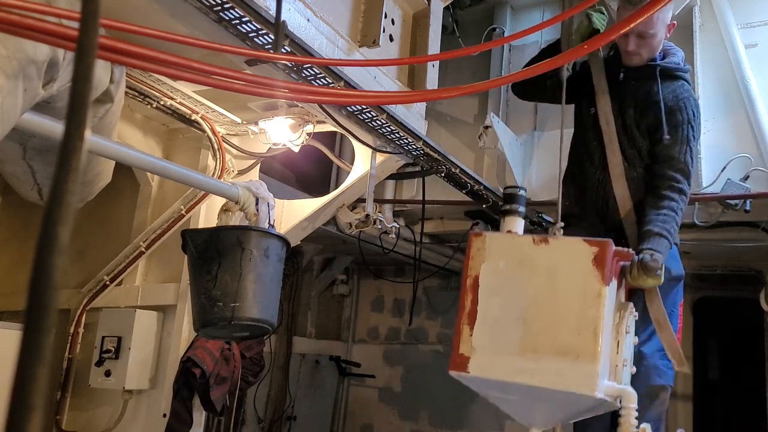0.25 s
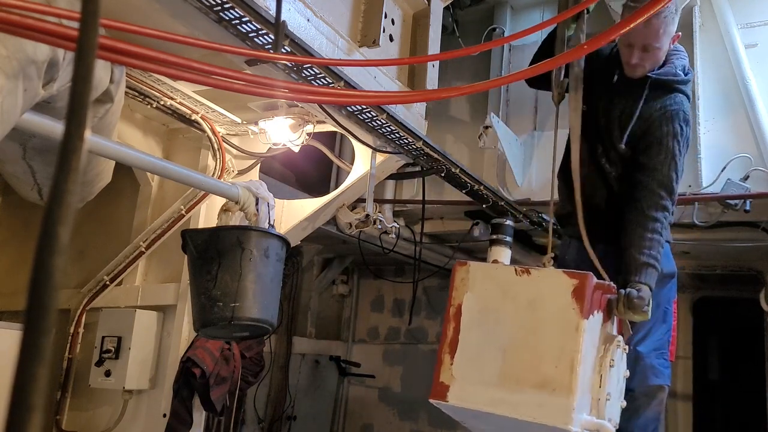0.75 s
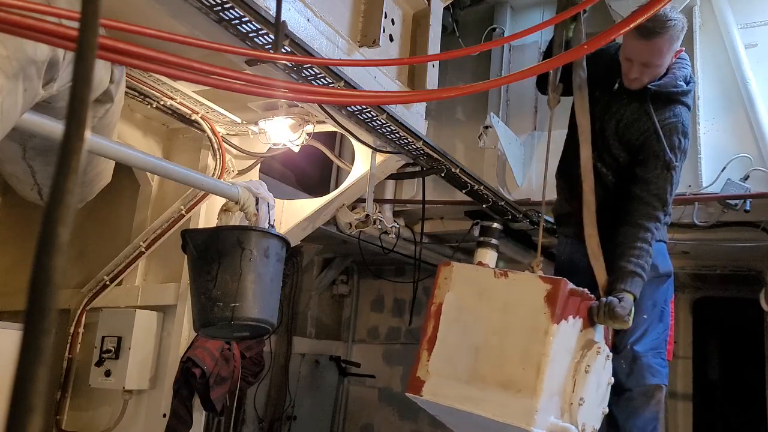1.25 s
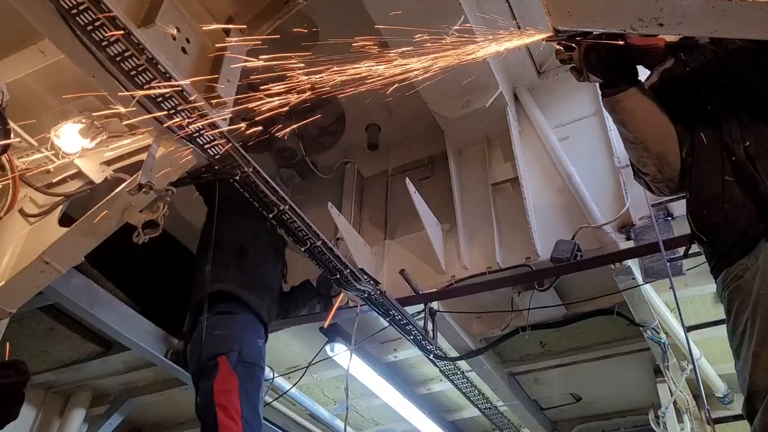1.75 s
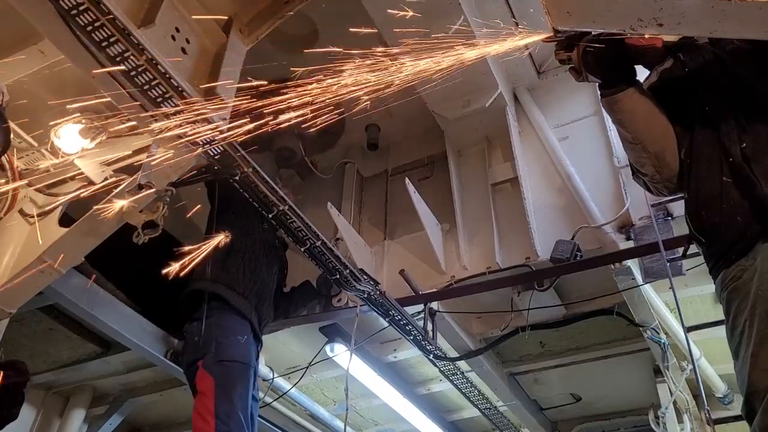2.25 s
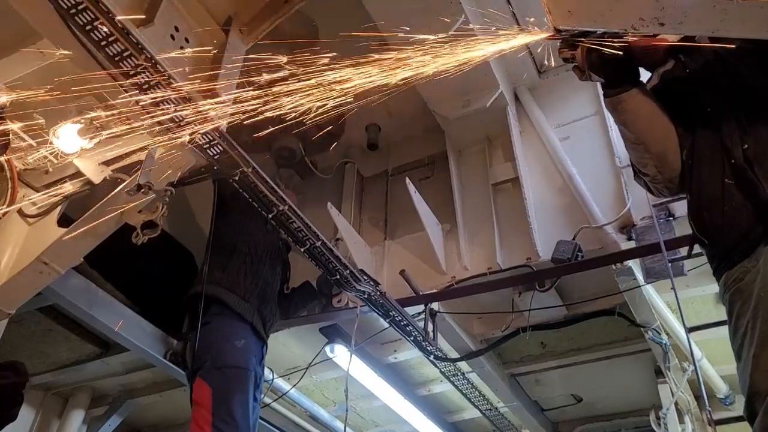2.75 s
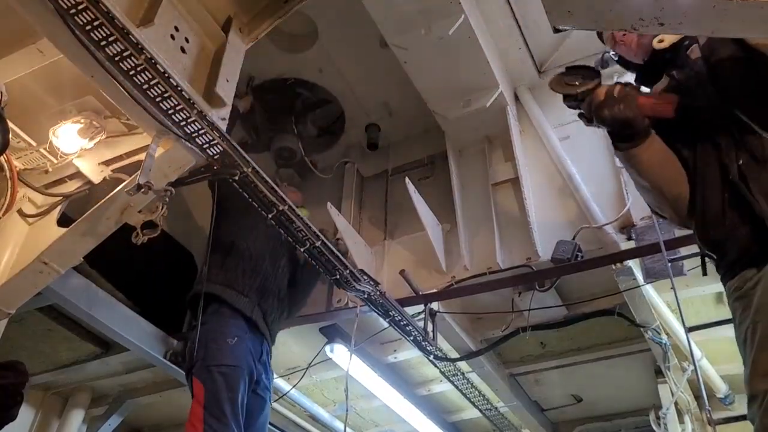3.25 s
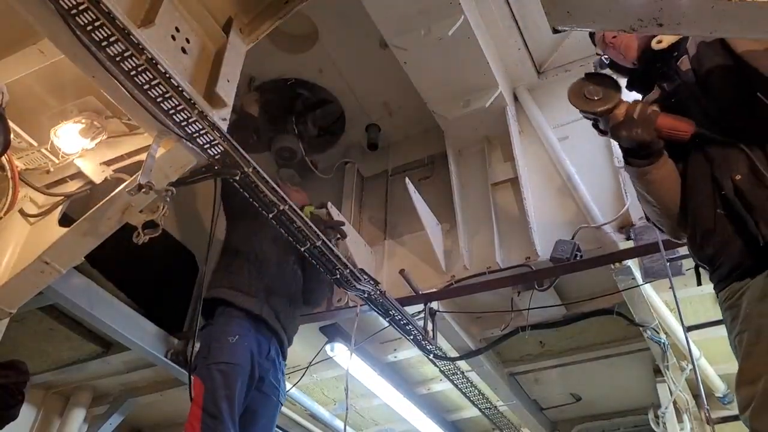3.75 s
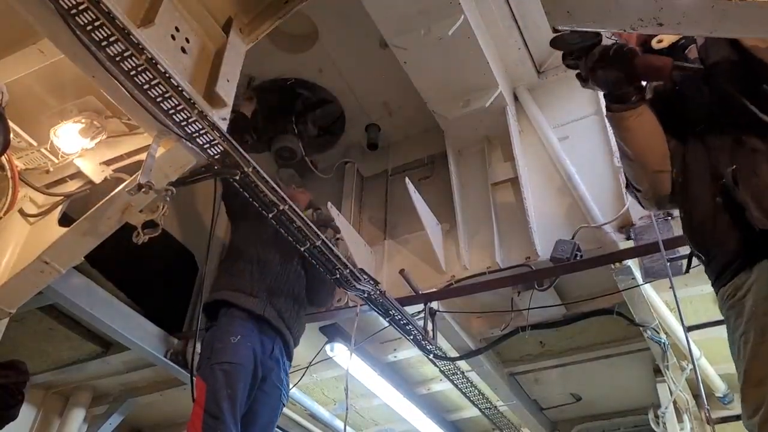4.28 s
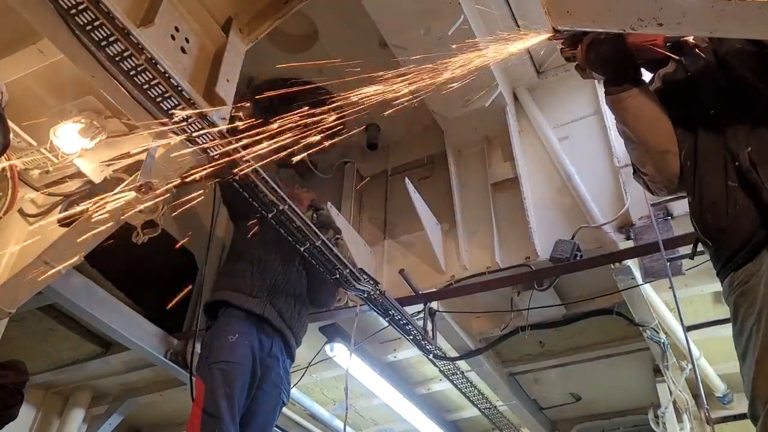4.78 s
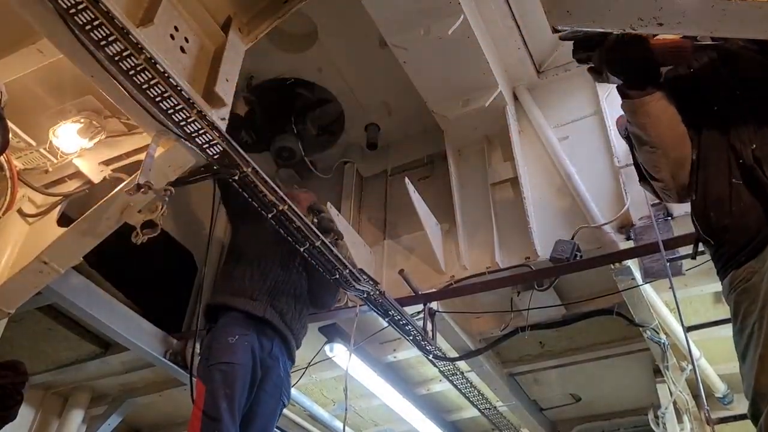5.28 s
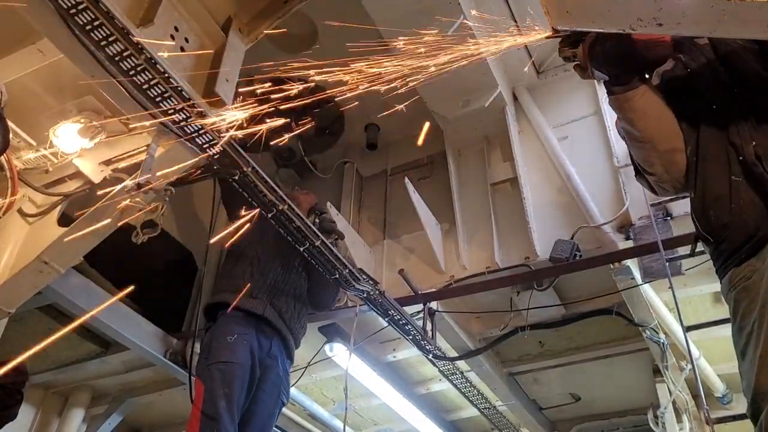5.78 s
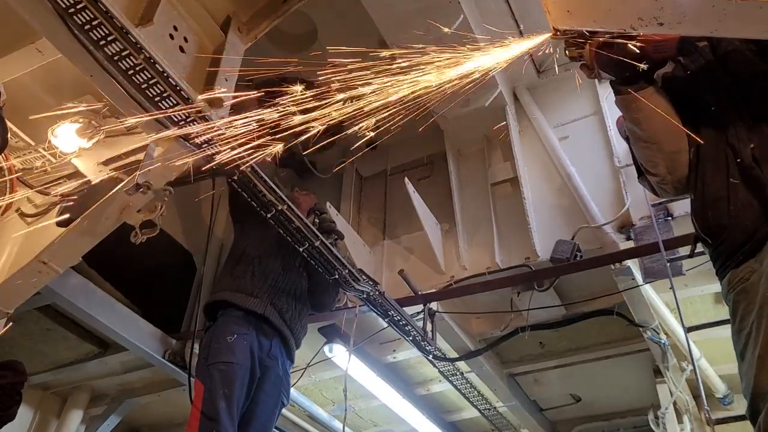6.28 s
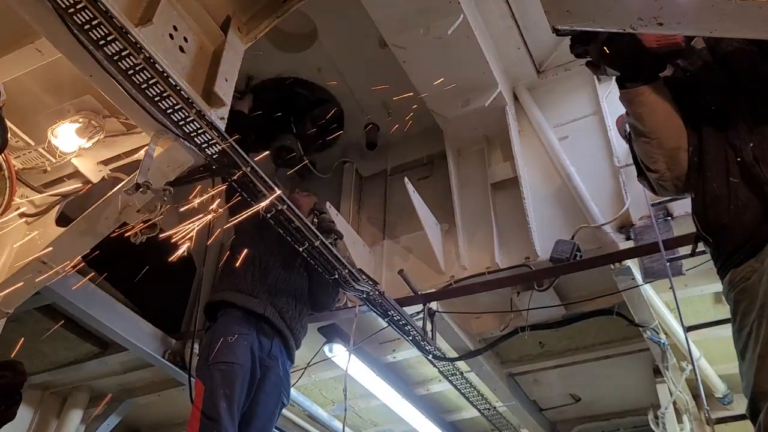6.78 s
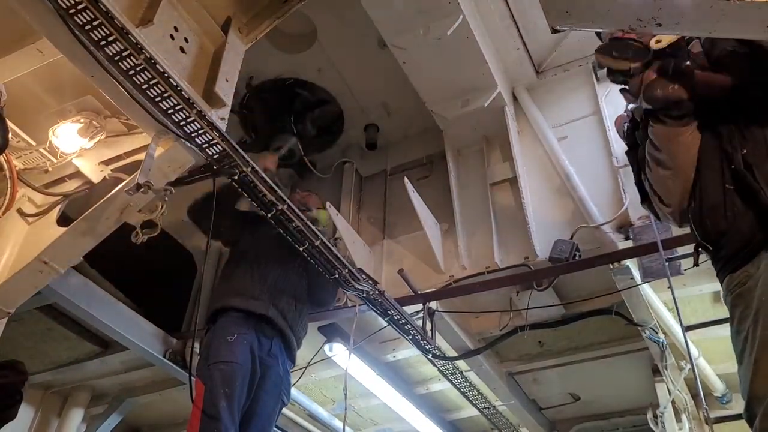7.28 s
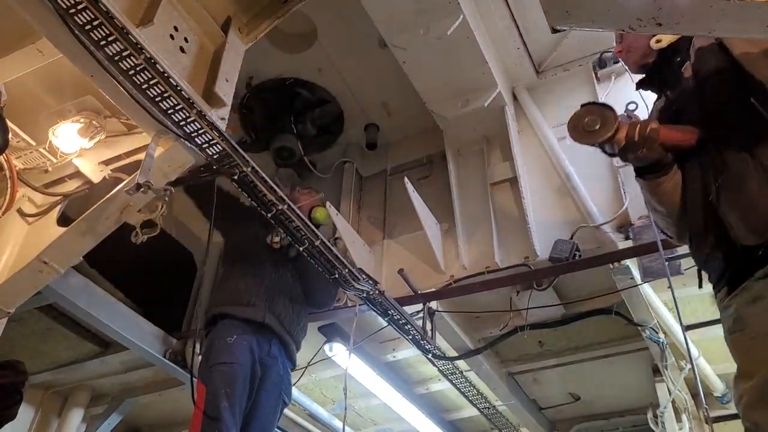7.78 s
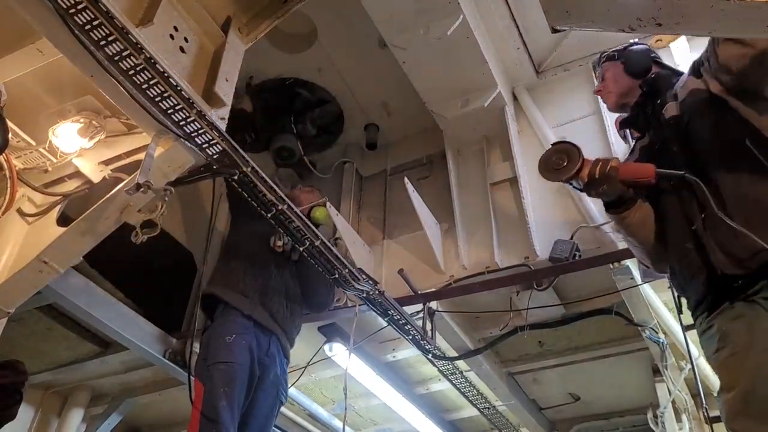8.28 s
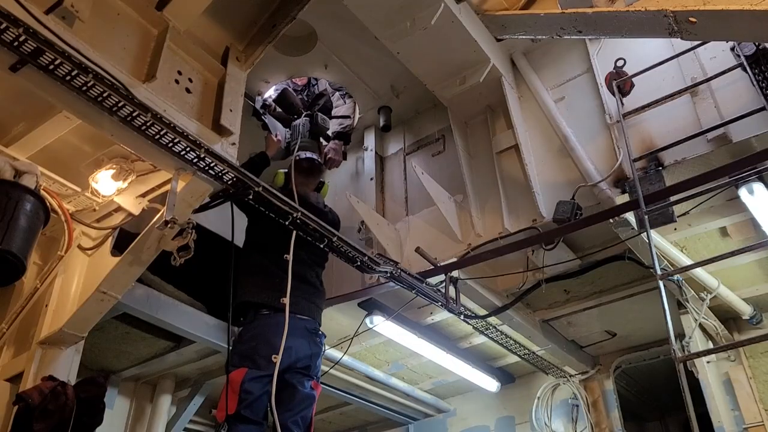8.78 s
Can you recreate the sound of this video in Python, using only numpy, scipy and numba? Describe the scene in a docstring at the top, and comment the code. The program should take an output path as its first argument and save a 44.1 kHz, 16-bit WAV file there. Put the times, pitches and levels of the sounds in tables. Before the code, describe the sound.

Inside a ship's steel hull, a hanging tank bumps the steelwork several times with low, hollow booms and a light scuff. Abruptly a generator drones and an angle grinder rasps into steel three times, its whine sagging with each bite and rising as it spins free. Near the end the grinder cuts off, the drone changes tone as if heard from another spot, and something squeaks faintly.

```python
"""Work inside a steel hull.

A slung tank bumps the steelwork of a quiet bay, and its faces and panels boom in their own modes.
Abruptly a four-cylinder generator drones through the plating in harmonics of its cycle, while an
angle grinder whines and bites steel three times, slowing under load. Near the end the grinder cuts
off, the engine is heard from a second place, where other harmonics are loud, and something squeaks."""
import sys
import numpy as np
from scipy import signal
from scipy.fft import rfft, irfft, next_fast_len
from scipy.io import wavfile
from scipy.ndimage import uniform_filter1d
from numba import njit

SR = 44100
rng = np.random.default_rng(int(sys.argv[2]) if len(sys.argv) > 2 else 0)


def master(y):
    """Save y as 16-bit WAV."""
    cut = np.clip(np.atleast_2d(y).T, -1, 1)
    pcm = np.round(cut * 32767)  # scale
    wavfile.write(sys.argv[1], SR, pcm.astype(np.int16))


N = 398663
TIME = np.arange(N) / SR
ENGINE_S, MOVE_S = 1.520, 8.392  # the machines come in; the listener changes place

def undb(db):
    """Amplitude ratio of a level in dB."""
    return 10 ** (np.asarray(db) / 20)

def unit(x):
    """Normalisation to rms 1."""
    return x / np.sqrt(np.mean(x ** 2))

def curves(table):
    """Linear interpolation of each column over the times in the first."""
    times, *columns = np.transpose(table)
    return [np.interp(TIME, times, c) for c in columns]

def gate(start, end, fade_s=0.00046):
    """Trapezoidal window: 1 between two moments, 0 outside."""
    return np.clip(np.minimum(TIME - start, end - TIME) / fade_s, 0, 1)

def wander(rate_hz):
    """Random modulation: held values, smoothed twice to a spread near 1."""
    hold = int(SR / rate_hz)
    steps = np.repeat(rng.standard_normal(N // hold + 1), hold)
    return 1.42 * uniform_filter1d(uniform_filter1d(steps, hold), hold)[:N]

# Stereo balance. Each row: frequency in Hz, left minus right level in dB.
BALANCE = [(60, -11), (110, 1), (200, -1.5), (380, 0.5), (700, -2.5), (1290, -2.5), (2380, 0), (4400, -2.5),
           (8120, -2), (15000, 2.5)]
COHERENT_HZ, QUADRATURE_SHARE = 445, .33  # the share is common treble, a quarter cycle apart

def noise(hz=(20, 20000), db=(0, 0)):
    """Partly coherent stereo noise, in dB per Hz: alike in the bass, little related in the treble."""
    size = next_fast_len(N)
    freq = np.fft.rfftfreq(size, 1 / SR) + 1
    mid, side = rfft(rng.standard_normal((2, size)))
    side = np.sqrt(1 - QUADRATURE_SHARE ** 2) * side - 1j * QUADRATURE_SHARE * mid
    apart = 1 / np.sqrt(1 + (COHERENT_HZ / freq) ** 4)
    balance_hz, balance_db = np.transpose(BALANCE)
    lean = undb(np.interp(np.log(freq), np.log(balance_hz), balance_db) / 2)
    gain = undb(np.interp(np.log(freq), np.log(hz), db)) * np.sqrt(SR / 2 / (1 + apart ** 2))
    channels = np.array([(mid + apart * side) * lean, (mid - apart * side) / lean])
    return irfft(gain * channels, size)[:, :N]

def coloured(spectrum):
    """Spectral shaping of noise, at rms 1."""
    return unit(noise(*np.transpose(spectrum)))

@njit
def resonator(x, hz, width_hz):
    """Second-order resonance with gain 1 at its moving centre (state-variable filter)."""
    y, band_state, low_state = np.empty(len(x)), 0., 0.
    for i in range(len(x)):
        g, damping = np.tan(np.pi * hz[i] / SR), width_hz / hz[i]
        band = (band_state + g * (x[i] - low_state)) / (1 + g * (g + damping))
        band_state, low_state = 2 * band - band_state, low_state + 2 * g * band
        y[i] = damping * band
    return y

def ring(modes, flicker_db, rate_hz):
    """Forced vibration: noise drives modes that each swell and fade on their own; rms 1."""
    out, drive = 0, noise()
    for hz, width, db in modes:
        centre, stage_width = hz * (1 + 0.0012 * wander(4)), 1.4 * width
        band = [resonator(resonator(c, centre, stage_width), centre, stage_width) for c in drive]
        out = out + undb(db + flicker_db * wander(rate_hz)) * unit(np.array(band))
    return unit(out)

# Background of the bay. Each row: frequency in Hz, relative spectral density in dB.
BAY_SPECTRUM = [(15, -53), (25, -22), (96, -6.5), (141, -21), (449, -23), (557, -54), (621, -46),
                (3690, -57), (6500, -44.5), (15800, -63)]

def bay(level_db=-58.5):
    """Ambient noise, mostly bass, until the machines come in."""
    return undb(level_db) * coloured(BAY_SPECTRUM) * gate(-1, ENGINE_S)

# Course of the squeak. Each row: time in seconds, frequency in Hz, level in dB.
SQUEAK_GLIDE = [(8.64, 1540, -84), (8.70, 1640, -66), (8.76, 1680, -58), (8.81, 1690, -81)]

def squeak():
    """A faint pure tone glides upward; its phase is the integral of its frequency."""
    hz, db = curves(SQUEAK_GLIDE)
    tone = np.sqrt(2) * np.cos(2 * np.pi * np.cumsum(hz) / SR)
    return undb(db) * tone * gate(SQUEAK_GLIDE[0][0], SQUEAK_GLIDE[-1][0])

# The tank touches the steelwork. Each row: start and length in seconds, then the drive in dB
# of low face, upper face, side panels, hollow and scuffing hiss.
TANK_TOUCHES = [(-0.05, 0.054, -31.5, -35, -39.5, -46, -51.5), (0.077, 0.026, -49, -41, -64, -53, -82),
                (0.197, 0.064, -53, -57, -50, -55, -58), (0.276, 0.18, -24.5, -21.5, -36.5, -47, -50),
                (0.493, .07, -37, -58, -42, -47, -59.5), (0.804, 0.054, -50, -75, -52, -52.5, -64),
                (1.098, .05, -34, -80, -75, -96, -100), (1.322, 0.092, -55, -78, -64, -68, -79)]

def touch_envelope(part, rise_s, t60_s):
    """A damped resonator builds up while it is driven and decays exponentially afterwards."""
    out = 0
    for start, length, *levels_db in TANK_TOUCHES:
        since = TIME - start
        build_up = 1 - np.exp(-np.clip(since, 0, length) / rise_s)
        decay_db = 60 * np.maximum(since - length, 0) / t60_s
        out = out + undb(levels_db[part] - decay_db) * build_up
    return out

# Pitch of the two big faces. Each row: time in seconds, low face in Hz, upper face in Hz.
FACE_PITCH = [(0, 88.4, 103), (.46, 91.3, 104.3), (.56, 88.8, 106.4), (1.5, 87.5, 103)]
# Modes of the side panels and the hollow. Each row: frequency in Hz, width in Hz, relative level in dB.
PANEL_MODES = [(162, 22, -2), (202, 30, -1), (254, 23, -2), (301, 19, 0), (332, 21, -6),
               (388.5, 7.1, -13.5)]
HOLLOW_MODES = [(454, 10.5, -2.5), (518, 67, -7), (648, 79, -0.5), (772, 38, -6.5), (860, 36, -7),
                (974, 40, -6.5)]
# Scuffing hiss. Each row: frequency in Hz, relative spectral density in dB.
SCUFF_SPECTRUM = [(650, -8.5), (1100, -4), (1550, -4), (2540, -9.5), (2810, -9.5), (3110, -10.5),
                  (6860, -11), (8770, -22), (12000, -19), (15800, -24)]

def tank(in_phase_s=.373):
    """Modal vibration: two faces boom and beat together, over panels, hollow and a scuffing hiss."""
    turns = np.cumsum(curves(FACE_PITCH), axis=1) / SR
    low, upper = np.sqrt(2) * np.cos(2 * np.pi * (turns - turns[:, [int(in_phase_s * SR)]]))
    muffle = undb(np.interp(TIME, (.72, .92), (0, -12)))  # the low face is muffled and stays so
    low = low * touch_envelope(0, rise_s=.17, t60_s=1.88) * muffle
    upper = upper * touch_envelope(1, rise_s=.032, t60_s=.32)
    booms = low * undb([[1.6], [-1.6]]) + upper * undb([[.4], [-.4]])  # both lean left
    panels = touch_envelope(2, rise_s=.012, t60_s=.82) * ring(PANEL_MODES, 2.6, rate_hz=11.27)
    hollow = touch_envelope(3, rise_s=.04, t60_s=.66) * ring(HOLLOW_MODES, 1.9, rate_hz=14.7)
    hiss = undb(0.64 * wander(29.7)) * coloured(SCUFF_SPECTRUM)
    scuff = touch_envelope(4, rise_s=.034, t60_s=.9) * hiss
    return (booms + panels + hollow + scuff) * gate(-1, ENGINE_S)

CYCLE_HZ, CYCLE_SAMPLES = 12.186, 4096

def engine_cycle(order, levels_db, crank_turns, scatter_turns, dispersion=.8 / 60):
    """Fourier synthesis of one cycle: the plating disperses the knock and the hull scatters its phases."""
    chance = rng.standard_normal(len(order))
    knock_turns = -0.33 + crank_turns * order - dispersion * order ** 2
    knock_turns += scatter_turns * chance * (order % 4 > 0)  # spares the firing orders
    phase = 2 * np.pi * np.where(order < 40, knock_turns, chance)
    # In radians; it grows once the wavelength nears the size of the bay.
    left_lag = 0.074 + np.clip(0.036 * (order - 20), 0, 1.6)
    spectrum = np.zeros((2, CYCLE_SAMPLES // 2 + 1), complex)
    spectrum[:, order] = undb(levels_db) * np.exp(1j * (phase + np.outer([-.5, .5], left_lag)))
    return irfft(spectrum) * CYCLE_SAMPLES / np.sqrt(2)

# Prominent harmonics. Each row: multiple of the cycle rate, left and right level in dB at the
# first place, then at the second.
STRONG_ORDERS = [(4, -44, -42, -42, -41), (6, -62, -59, -63, -63), (8, -41, -39, -39, -38),
                 (9, -54, -49, -53, -47), (10, -48, -47, -46, -44), (12, -40, -36, -42, -38),
                 (13, -48, -46, -45, -47), (14, -52, -54, -59, -54), (15, -56, -53, -57, -54),
                 (16, -52, -62, -76, -51), (17, -64, -55, -56, -52), (18, -60, -56, -58, -55),
                 (19, -41, -41, -46, -48), (20, -53, -53, -51, -48), (21, -54, -68, -50, -45),
                 (22, -55, -51, -46, -45), (23, -49, -46, -40, -38), (25, -57, -51, -46, -46),
                 (26, -56, -50, -60, -58), (27, -55, -65, -49, -50), (28, -55, -53, -49, -52),
                 (30, -48, -50, -48, -70), (43, -73, -65, -68, -61), (44, -59, -60, -68, -63),
                 (45, -65, -62, -58, -56), (46, -75, -66, -63, -56), (48, -70, -80, -69, -55),
                 (53, -75, -62, -69, -84), (56, -70, -69, -65, -61), (57, -83, -64, -65, -61),
                 (58, -66, -65, -68, -77), (60, -74, -64, -60, -58), (66, -67, -69, -73, -71),
                 (72, -54, -57, -52, -55), (80, -64, -59, -62, -70), (89, -71, -70, -70, -70)]
# Trend of the other harmonics. Each row: frequency in Hz, level in dB at each of the two places.
WEAK_ORDER_TREND = [(60.3, -73, -66), (135, -70, -57), (300, -64, -55), (425, -73.5, -74),
                    (664, -75.5, -68), (1010, -83, -81.5), (1200, -83, -85)]
# Rumble and clatter. Each row: frequency in Hz, density in dB per Hz at each of the two places.
RUMBLE_SPECTRA = [(30, -88, -77), (60.7, -93, -78), (110, -79.5, -77), (270, -78.5, -74), (364, -77, -73.5),
                  (567, -85, -94), (780, -83.5, -100), (940, -80.5, -89), (1066, -82.5, -84),
                  (1324, -87.5, -92), (1640, -92.5, -86.5), (2320, -90, -91), (4530, -110, -101),
                  (7400, -114, -104), (8400, -124, -117), (15600, -124, -113)]
# The drone sounds about 1 dB louder at times, mostly between grinder bites.
# Each row: time in seconds, gain in dB added to the levels above.
DRONE_GAIN = [(1.52, 0.), (3.85, 0.), (4.05, 1.4), (4.6, 1.2), (4.9, 0.5), (6.0, 0), (7.6, 0), (8.1, 1.5),
              (8.42, 1), (9.04, 0.5)]

def generator(weak_spread_db=4):
    """Periodic excitation: a governed engine sounds harmonics, over rumble throbbing with the firings."""
    order = np.arange(4, 99)
    weak_hz, *weak_db = np.transpose(WEAK_ORDER_TREND)
    trend_db = [np.interp(np.log(order * CYCLE_HZ), np.log(weak_hz), c) for c in weak_db]
    db = np.repeat(trend_db, 2, axis=0) + weak_spread_db * rng.standard_normal((4, len(order)))
    strong, *strong_db = np.transpose(STRONG_ORDERS)
    db[:, strong - order[0]] = strong_db
    turns = CYCLE_HZ * TIME + 0.0011 * wander(0.753)
    throb = 1 + 0.1 * np.cos(2 * np.pi * 4 * turns)  # four firings a cycle
    rumble_hz, *rumble_db = np.transpose(RUMBLE_SPECTRA)
    grid = np.arange(CYCLE_SAMPLES) / CYCLE_SAMPLES
    crank_turns, scatter_turns = (.57, .74), (.1, .24)  # at each place
    out = 0
    for place, span in enumerate([(ENGINE_S, MOVE_S), (MOVE_S - .002, np.inf)]):
        cycle = engine_cycle(order, db[2 * place:2 * place + 2], crank_turns[place], scatter_turns[place])
        drone = np.array([np.interp(turns % 1, grid, c, period=1) for c in cycle])
        rumble = noise(rumble_hz, rumble_db[place]) * throb
        out = out + (drone + rumble) * gate(*span)
    return out * undb(curves(DRONE_GAIN)[0])

@njit
def repeat_each_turn(x, turn_samples, share):
    """Comb filtering: a share of the sound returns one turn later, at constant noise power."""
    y = np.zeros(len(x))
    for i in range(1000, len(x)):
        lag = int(turn_samples[i])
        past = y[i - lag] + (turn_samples[i] - lag) * (y[i - lag - 1] - y[i - lag])
        y[i] = np.sqrt(1 - share[i] ** 2) * x[i] + share[i] * past
    return y

# Air rushing through the grinder's fan. Each row: frequency in Hz, relative spectral density in dB.
FAN_SPECTRUM = [(760, -27), (1300, -27.5), (1470, -7), (1620, 0), (2080, 1), (3400, -4), (4420, -3),
                (5010, 2.5), (5510, -1.5), (7380, -2.5), (8910, -17), (11600, -11), (15800, -24)]
FREE_WHINE_HZ, FAN_BLADES, FAN_DB, SAG_DB_PER_KHZ = 5680, 30, -47.5, 4.0

def fan(sag_hz):
    """Air noise with a whine at the blade-passing frequency; a slower fan is lower and quieter."""
    whine_hz = FREE_WHINE_HZ - sag_hz
    air, white = coloured(FAN_SPECTRUM), noise()
    for multiple, width_hz, db in ((1, 300., -5.5), (2.08, 1800., -20.5)):
        whine = np.array([resonator(c, multiple * whine_hz, width_hz) for c in white])
        air = air + undb(db) * unit(whine)
    air = np.array([repeat_each_turn(c, SR * FAN_BLADES / whine_hz, np.full(N, 0.32)) for c in air])
    return undb(FAN_DB - SAG_DB_PER_KHZ * sag_hz / 1000 + 0.28 * wander(19)) * air

# Modes of disc and beam in low, middle and high groups. Each row: frequency in Hz, width in Hz,
# level within the group in dB.
STEEL_MODES = [
    [(1668, 31, -8), (2210, 120, -7), (2439, 55, -1.5), (3156, 67, -1), (3400, 140, 0)],
    [(3775, 75, 1.5), (3957, 127, 10.5), (4124, 49, 5)],
    [(5095, 28, -4.5), (5145, 59, -0.5), (5280, 24, -7), (5230, 50, -5), (6204, 104, 1), (6340, 120, -4.5),
     (7560, 500, -1)],
]
# Scrape and sizzle of the grit. Each row: frequency in Hz, relative spectral density in dB.
SCRAPE_SPECTRUM = [(760, -24), (1300, -10.5), (2370, 1.5), (3580, -11), (3900, 0), (4460, -3), (5190, -4),
                   (5750, -2.5), (6220, 3.5), (8600, -18.5), (11200, -41), (18900, -120)]
SIZZLE_SPECTRUM = [(4880, -27), (8300, -3.5), (9120, -1), (9480, -6.5), (10200, -1), (11300, -5.5),
                   (12000, 1.5), (12800, -8), (15100, -5.5), (15800, -13.5)]
# The hand on the grinder. Each row: time in seconds, gain of the cut in dB, tilt from the middle
# modes to the high ones in dB, extra sizzle in dB.
HAND_PRESSURE = [(1.52, -42.5, 2.5, 0.5), (1.75, -46, 0.5, 2), (1.90, -42.5, 6, -2.5),
                 (1.95, -43, -3.5, -2), (2.04, -45.5, 3.5, 4.5), (2.14, -42.5, 1.5, -0.5),
                 (2.35, -45, 2.5, 2), (2.68, -43, -0.5, -0.5), (2.77, -42, -2, -4), (2.86, -45.5, 2, -1),
                 (2.91, -56, -1, -3), (4.5, -56, 1, 0), (4.55, -51, 2, 2), (4.59, -53, -1, -2),
                 (4.63, -50.5, 0, 6), (4.70, -42.5, -0.5, 1), (4.80, -46, 1.5, 2), (4.95, -41, -3, -3),
                 (5.05, -57, -5, -3), (5.54, -60, 0, 0), (5.57, -46.5, -1, 0), (5.70, -43, -5.5, -0.5),
                 (5.85, -44, 4, 2), (5.93, -41.5, 1.5, 4), (6.02, -42.5, 0, -3), (6.11, -42.5, -2, 2),
                 (6.23, -42.5, 1, -3), (6.37, -42.5, 0, 3), (6.52, -43.5, -3, -4), (6.65, -41, 0, 1.5),
                 (6.70, -41.5, 0.5, 2), (6.86, -58, 2, -2)]

def abrasion(low_db, middle_db, high_db, sizzle_db):
    """Friction noise: grit scrapes and sizzles on the steel and drives the modes of disc and beam."""
    low, middle, high = (ring(modes, flicker_db=1.35, rate_hz=14) for modes in STEEL_MODES)
    cut_db, tilt_db, extra_db = curves(HAND_PRESSURE)
    scrape = undb(-1.5) * coloured(SCRAPE_SPECTRUM)
    sizzle = undb(sizzle_db + extra_db + wander(120)) * coloured(SIZZLE_SPECTRUM)
    rings = undb(low_db) * low + undb(middle_db - tilt_db) * middle + undb(high_db + tilt_db) * high
    return undb(cut_db) * (scrape + sizzle + rings)

# The disc bites steel. Each row: start and end in seconds, full sag of the whine in Hz, disc turns
# per second, share repeated each turn, then relative dB of low, middle and high modes and sizzle.
DISC_BITES = [(1.0, 2.92, 960, 117, 0.54, -6.5, -4.5, -2.5, -8.5),
              (4.502, 5.052, 600, 136, 0.3, -14, -6.5, -6, -7.5),
              (5.55, 6.863, 860, 140, 0.37, -11.5, -6.5, -3.5, -11)]

def grinder(motor_lag_s=0.42):
    """First-order lag: the motor slows under each bite and recovers; rotation modulates the cut."""
    starts, ends, *columns = np.transpose(DISC_BITES)
    contact = sum(gate(start, end, fade_s=0.0093) for start, end in zip(starts, ends))
    latest_bite = np.clip(np.searchsorted(starts, TIME) - 1, 0, None)
    load_hz, disc_hz, share, *levels_db = (c[latest_bite] for c in columns)
    step = 1 / (motor_lag_s * SR)
    air = fan(sag_hz=signal.lfilter([step], [1, step - 1], load_hz * contact))
    cut = abrasion(*levels_db) * contact
    disc_hz = disc_hz * (1 + 0.0026 * wander(5))
    wobble = 1 + 0.065 * np.cos(2 * np.pi * np.cumsum(disc_hz) / SR)  # the disc runs out of true
    bites = np.array([repeat_each_turn(c, SR / disc_hz, share) for c in cut * wobble])
    return (air + bites) * gate(ENGINE_S, MOVE_S)

def scene():
    """Superposition: the tank in the quiet bay, then generator and grinder, and a last squeak."""
    return tank() + bay() + generator() + grinder() + squeak()

def record(dry, cutoff_hz=15750):
    """Band limiting: a steep elliptic low-pass removes the highest treble."""
    return signal.sosfilt(signal.ellip(14, .3, 80, cutoff_hz, fs=SR, output="sos"), dry)

dry = scene()
out = record(dry)
master(out)
```